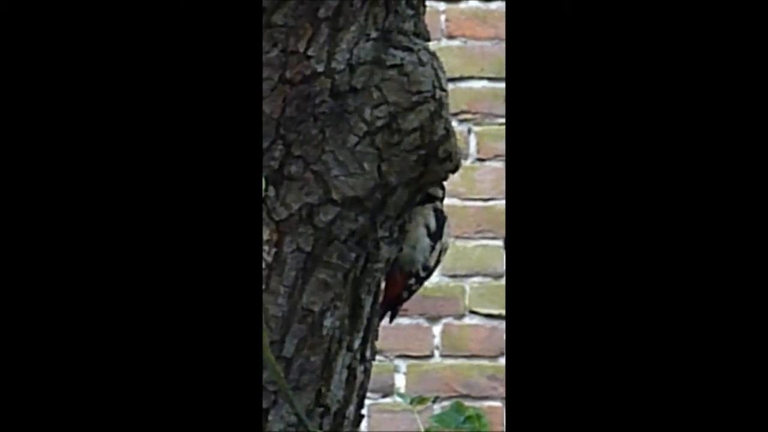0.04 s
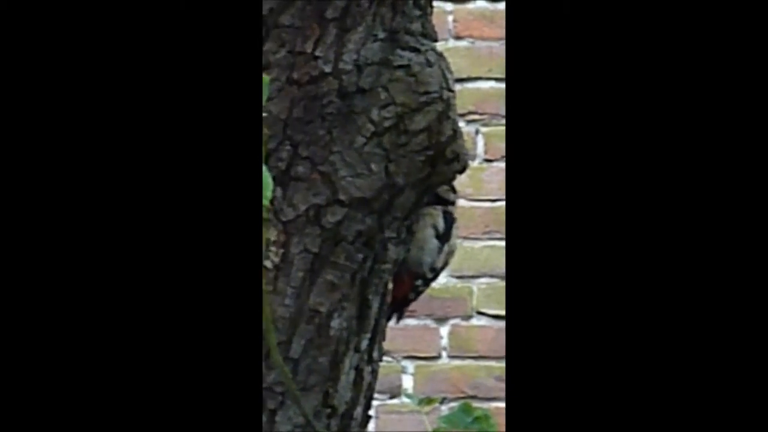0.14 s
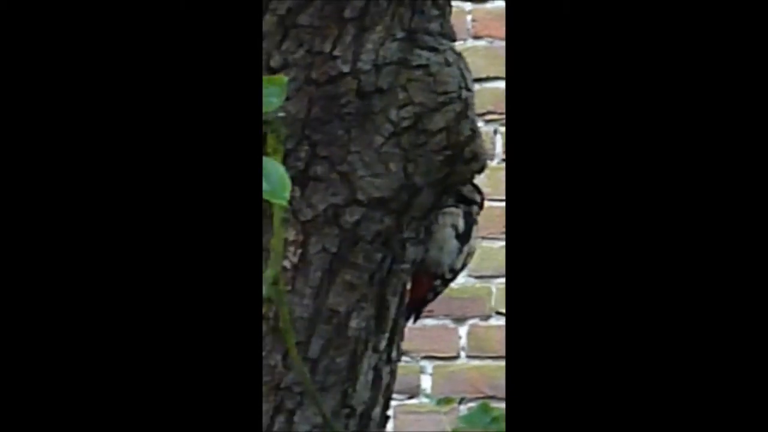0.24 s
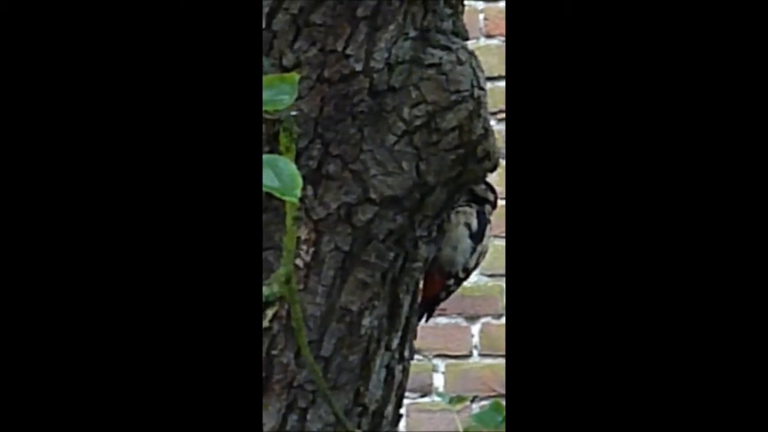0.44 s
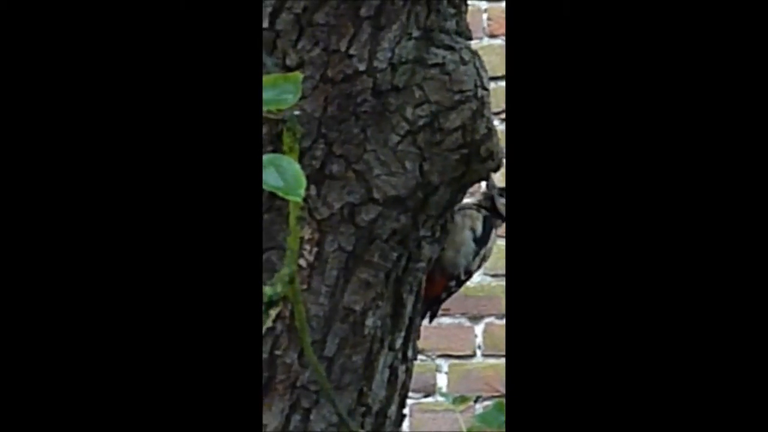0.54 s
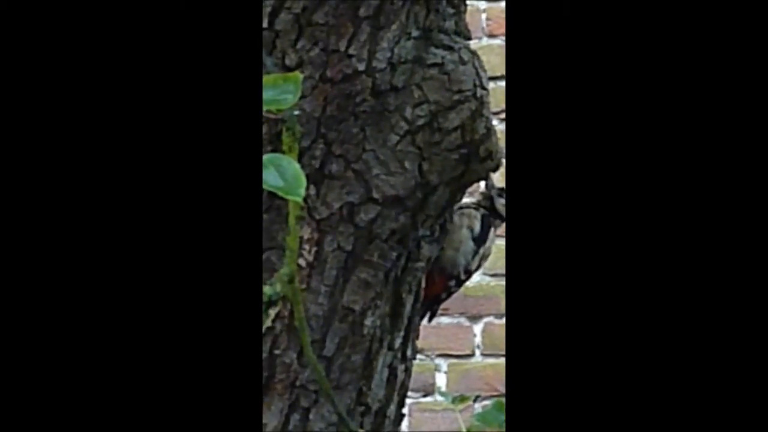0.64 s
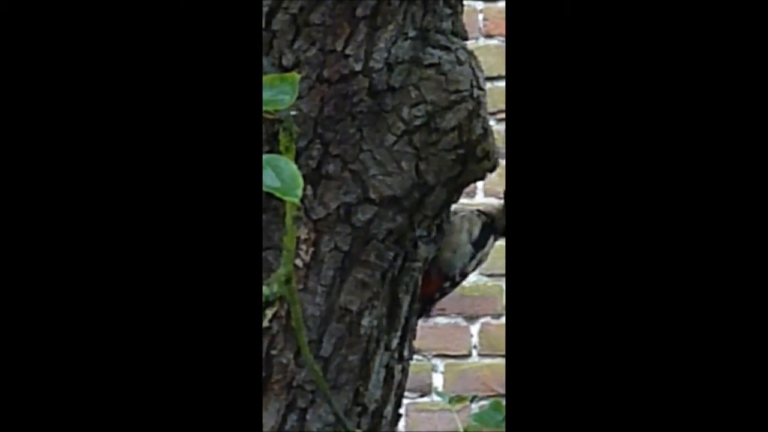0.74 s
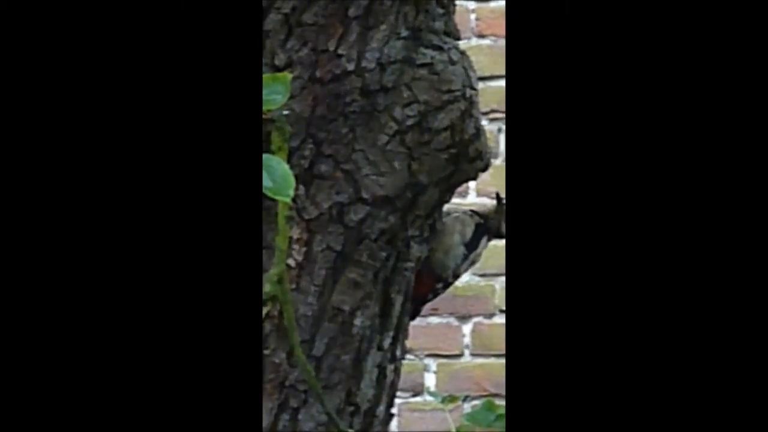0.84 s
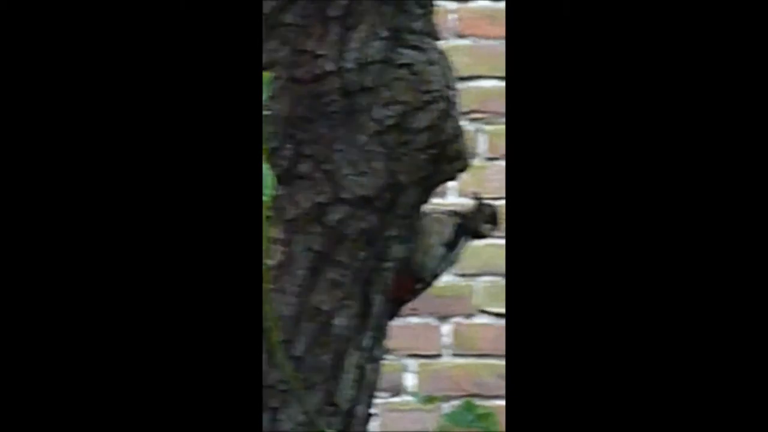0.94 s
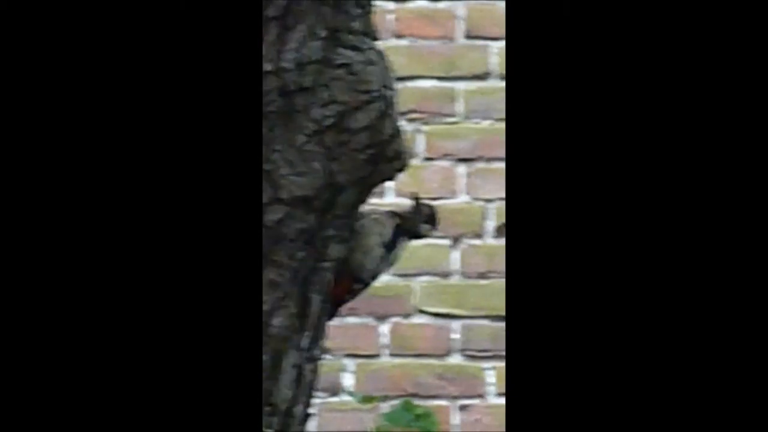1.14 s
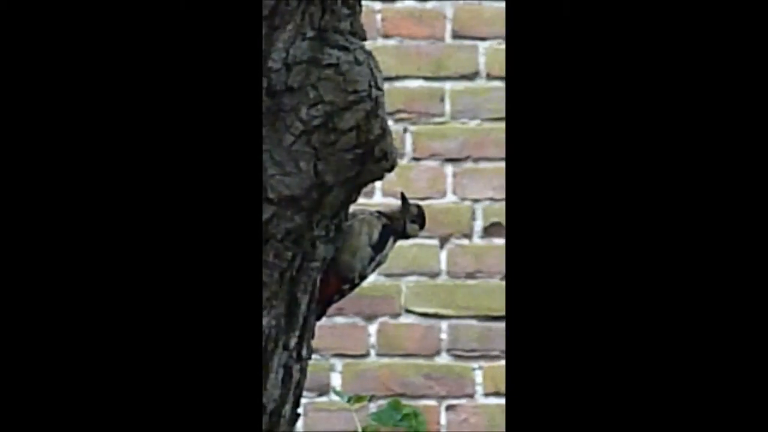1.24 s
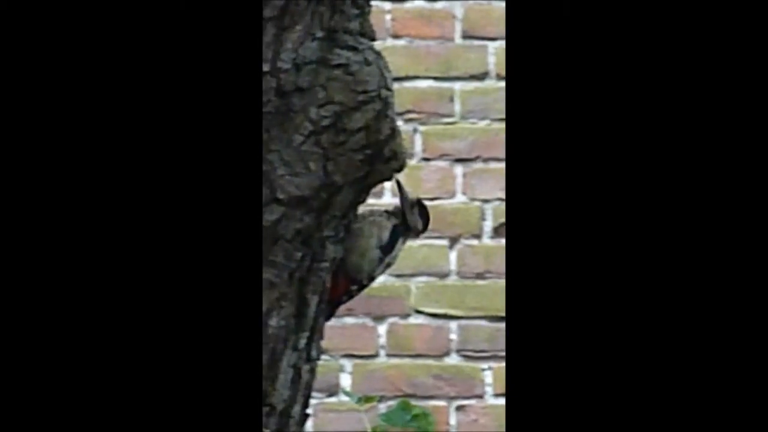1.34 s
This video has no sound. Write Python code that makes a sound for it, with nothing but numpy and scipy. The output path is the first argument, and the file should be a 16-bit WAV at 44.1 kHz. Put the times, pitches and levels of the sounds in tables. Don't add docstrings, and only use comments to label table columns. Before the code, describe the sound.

Single bright woodpecker chirp ringing off brick walls, with close recorder ticks and faint distant traffic

```python
import sys
import numpy as np
from scipy import signal
from scipy.io import wavfile
from scipy.ndimage import uniform_filter1d

SR = 44100
rng = np.random.default_rng(int(sys.argv[2]) if len(sys.argv) > 2 else 0)


def master(y):
    cut = np.clip(np.atleast_2d(y).T, -1, 1)
    pcm = np.round(cut * 32767)
    wavfile.write(sys.argv[1], SR, pcm.astype(np.int16))


def voltage_ratio(decibels):
    exponent = np.asarray(decibels, float) / 20
    return 10 ** exponent


N = 61739
T = np.arange(N) / SR

# time_s, pitch_hz, level_db
WHISTLE = [
    (0.435, 2799, -47),
    (0.448, 2885, -40),
    (0.456, 2701, -38.5),
    (0.47, 2869, -35.5),
    (0.488, 2966, -35),
    (0.499, 2826, -35),
    (0.51, 2601, -32),
    (.522, 2373, -36),
    (0.529, 2310, -46.5),
]
WHISTLE_PARTIALS = [0.5, -24, -26.5]
# start_s, length_s, start_hz, end_hz, level_db
BREAKS = [
    (0.4296, .010, 1349, 1912, -44.5),
    (0.5243, 0.021, 1923, 1400, -43.5),
]
BREAK_PARTIALS = [-3.5, -3, -16, -18]
# freq_hz, gain_db
BEAK = [(1200, -5), (2900, 0.3), (3800, -7.5), (4800, -8), (5900, .1), (6600, -29), (7300, 4), (8500, -5)]
# delay_s, level_db, pan_left_over_right_db
MIRRORS = [
    (.0062, -11, -0.5),
    (0.0129, -6.5, -8.5),
    (0.0211, -7.5, 12.5),
    (0.0277, -6, -3),
]
# delay_s, level_re_wash_db, smear_s
ECHOES = [
    (.047, -15.5, .006),
    (.11, -11.5, 0.021),
    (.3, -31, .05),
]
# start_s, level_db, pan_left_over_right_db, ring_hz, t60_s
TICKS = [
    (0.2303, -25.5, 2.5, 3370, .005),
    (0.2289, -39.5, 3, 895, 0.0089),
    (0.2309, -10, -10, 6510, 0.0021),
    (.2309, -15.5, -14.5, 4910, 0.0045),
    (.2317, -24.5, -6, 3600, 0.0056),
    (.2313, -25, 1.5, 1820, 0.0053),
    (.2322, -26.5, -10.5, 2625, 0.0054),
    (.2330, -28.5, -8, 5900, 0.0054),
    (.2338, -41, -5, 2250, 0.012),
]
# start_s, level_db, pan_left_over_right_db, ring_hz, t60_s
FAINT_TICKS = [
    (0.343, -39.5, -15, 3760, 0.0067),
    (0.344, -40, -4, 1800, .008),
    (0.3462, -42, -4, 1050, .010),
    (0.346, -45, -10, 4200, 0.0061),
    (.1750, -53, 5, 5180, 0.0046),
    (1.009, -47, -15, 5660, .006),
]
# start_s, level_db, t60_s, low_hz, high_hz
SCUFFS = [
    (0.2291, -38, 0.014, 1400, 7800),
    (0.235, -50, .09, 1800, 2820),
    (0.3425, -48.5, .025, 1000, 4300),
]
# time_s, level_db
TRAFFIC_SWELL = [
    (0.0, -56),
    (0.622, -54),
    (0.864, -56),
    (1.4, -57),
]
# freq_hz, density_db
TRAFFIC = [(15, -51.5), (25, -22.5), (115, -1.5), (172, -10), (204, -5.5), (344, -5.5), (495, -7.5),
           (918, -5), (2500, -30), (3250, -53), (5500, -120)]
# freq_hz, density_db
HISS = [(880, -31), (1500, 0.5), (1670, 7), (1800, -1.5), (2310, -8), (7220, -18), (8200, -27),
        (10700, -66), (18000, -120)]
# freq_hz, level_db, start_s
TONES = [
    (1750, -69, 0.97),
    (1250, -70.5, .001),
]
# freq_hz, correlation
LIKENESS = [(60, 0.92), (160, 0.9), (420, 0.9), (1120, 0.78), (2980, 0.19), (7900, 0.069)]


def rms_one(x):
    return x / np.sqrt(np.mean(x ** 2) + 1e-20)


def at_hz(points, hz):
    points = np.array(points)
    return np.interp(np.log(hz), np.log(points[:, 0]), points[:, 1])


def drift(rate_hz):
    pole = np.exp(-2 * np.pi * rate_hz / SR)
    white = rng.standard_normal(N + SR)
    return rms_one(signal.lfilter([1], [1, -2 * pole, pole * pole], white)[SR:])


def voice(pitch_hz, levels_db, rough):
    waver = 1 + rough * 0.006 * drift(162)
    phase = 2 * np.pi * np.cumsum(pitch_hz * waver) / SR
    out = 0
    for k, level_db in enumerate(levels_db, start=1):
        flutter_db = np.sqrt(rough) * 2.5 * drift(99)
        gain = voltage_ratio(level_db + at_hz(BEAK, k * pitch_hz) + flutter_db)
        out = out + gain * np.sin(k * phase)
    return np.sqrt(2) * out


def call():
    time_s, pitch_hz, level_db = np.transpose(WHISTLE)
    gate = np.clip(np.minimum(T - time_s[0], time_s[-1] - T) / 0.003, 0, 1)
    pitch = uniform_filter1d(np.interp(T, time_s, pitch_hz), size=300)
    out = gate * voltage_ratio(np.interp(T, time_s, level_db)) * voice(pitch, WHISTLE_PARTIALS, rough=0.99)
    for start_s, length_s, start_hz, end_hz, break_db in BREAKS:
        part = np.clip((T - start_s) / length_s, 0, 1)
        attack = np.minimum(part / 0.12, 1)
        envelope = np.minimum(attack, 3 * (1 - part))
        glide_hz = start_hz + (end_hz - start_hz) * part
        out = out + voltage_ratio(break_db) * envelope * voice(glide_hz, BREAK_PARTIALS, rough=2.2)
    return out


def walls(source):
    rise_s, t60_s, alike = 0.008, 1, 0.78
    shape = (1 - np.exp(-T / rise_s)) * voltage_ratio(-60 * T / t60_s + 0.5 * drift(40))
    shape = shape / np.sqrt(np.sum(shape ** 2))
    for delay_s, level_db, smear_s in ECHOES:
        bump = np.exp(-((T - delay_s) / smear_s) ** 2)
        shape = shape + voltage_ratio(level_db) * bump / np.sqrt(smear_s * SR)

    highpass = signal.butter(2, 1710, "high", fs=SR, output="sos")
    scattered = signal.sosfilt(highpass, source)
    responses = rng.standard_normal((2, N)) * shape
    mid, side = [rms_one(signal.fftconvolve(r, scattered)[:N]) for r in responses]
    wash = np.sqrt((1 + alike) / 2) * mid + np.sqrt((1 - alike) / 2) * side * [[1], [-1]]

    near = 0
    for delay_s, level_db, pan_db in MIRRORS:
        gain = voltage_ratio(level_db + pan_db * np.array([[0.5], [-0.5]]))
        near = near + gain * np.roll(scattered, int(delay_s * SR))
    return voltage_ratio(1) * source + near + voltage_ratio(-1.5) * np.std(scattered) * wash


def knock(start_s, ring_hz, t60_s):
    age_s = np.clip(T - start_s, 0, None)
    fall = 2 * age_s * np.log(1000) / t60_s
    return fall * np.exp(1 - fall) * np.sin(2 * np.pi * ring_hz * age_s)


def casing():
    out = 0
    for left_lag_s, ticks in [(0.0001, TICKS), (0, FAINT_TICKS)]:
        for start_s, level_db, pan_db, ring_hz, t60_s in ticks:
            left = voltage_ratio(level_db + pan_db) * knock(start_s + left_lag_s, ring_hz, t60_s)
            right = voltage_ratio(level_db) * knock(start_s, ring_hz, t60_s)
            out = out + np.array([left, right])
    for start_s, level_db, t60_s, low_hz, high_hz in SCUFFS:
        band = signal.butter(3, [low_hz, high_hz], "band", fs=SR, output="sos")
        noise = rms_one(signal.sosfilt(band, rng.standard_normal((2, N))))
        decay_db = -60 * np.clip(T - start_s, 0, None) / t60_s
        out = out + (T > start_s) * voltage_ratio(level_db + decay_db) * noise
    return out


def thump():
    return voltage_ratio(-39) * knock(1.3555, ring_hz=330, t60_s=0.017)


def banded_noise(spectrum, low_hz, patchy_db):
    white = rng.standard_normal((2, 2, N + SR // 4))
    edges_hz = 22 * 2 ** np.arange(0, 8.8, 1 / 3)
    out = 0
    for k, (low, high) in enumerate(zip(edges_hz, edges_hz[1:])):
        band = signal.butter(2, [low, high], "band", fs=SR, output="sos")
        mid, side = signal.sosfilt(band, white[k % 2])[:, -N:]
        hz = np.sqrt(low * high)
        alike = at_hz(LIKENESS, hz)
        low_cut = np.sqrt(1 + (low_hz / hz) ** 8)
        gain = voltage_ratio(at_hz(spectrum, hz) + patchy_db * drift(6.9)) / low_cut
        stereo = np.sqrt(1 + alike) * mid + np.sqrt(1 - alike) * side * [[1], [-1]]
        out = out + gain * (hz < 1.15 * spectrum[-1][0]) * stereo
    return rms_one(out)


def town():
    time_s, level_db = np.transpose(TRAFFIC_SWELL)
    traffic = voltage_ratio(np.interp(T, time_s, level_db) + 1) * banded_noise(TRAFFIC, 20, patchy_db=1.1)
    hiss = voltage_ratio(-59.5) * banded_noise(HISS, 2220, patchy_db=0.98)
    tones = 0
    for hz, tone_db, start_s in TONES:
        fade_in = np.clip((T - start_s) / 0.028, 0, 1)
        tones = tones + voltage_ratio(tone_db + 1.3 * drift(8.1)) * fade_in * np.sin(2 * np.pi * hz * T)
    return traffic + hiss + tones


def scene():
    return walls(call()) + casing() + thump() + town()


def low_pass(x):
    return signal.sosfilt(signal.butter(12, 8500, fs=SR, output="sos"), x)


def record(dry):
    rate_hz, fold_db = 16000, -3.5
    notch_hz, notch_width_hz = 5440, 320
    folded = dry * (1 + 2 * voltage_ratio(fold_db) * np.cos(2 * np.pi * rate_hz * T))
    notched = signal.lfilter(*signal.iirnotch(notch_hz, notch_hz / notch_width_hz, SR), folded)
    top_cut = signal.cheby2(N=16, rs=90, Wn=8956, fs=SR, output="sos")
    mix = signal.sosfilt(top_cut, notched)
    return low_pass(mix)


dry = scene()
out = record(dry)
master(out)
```